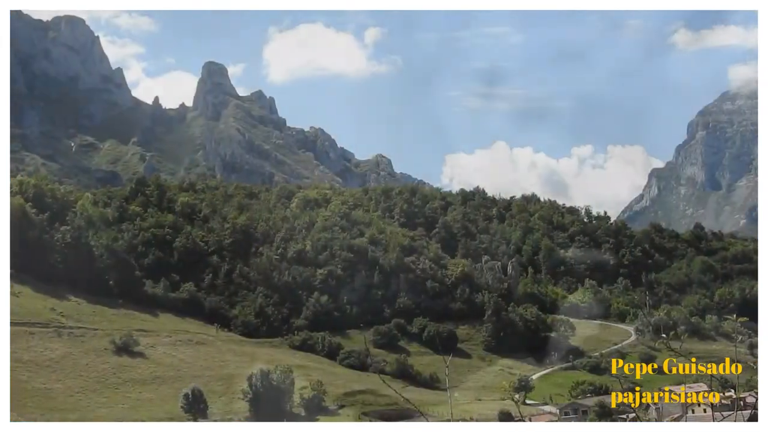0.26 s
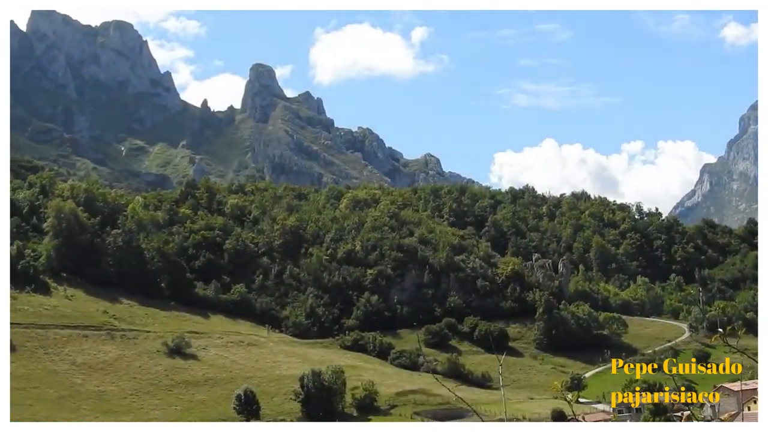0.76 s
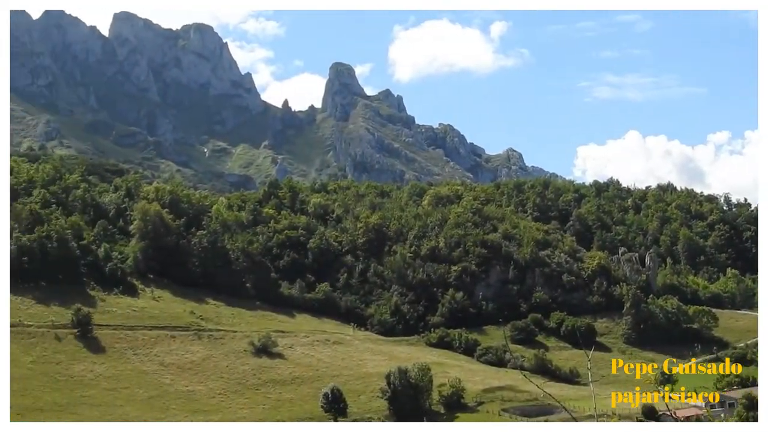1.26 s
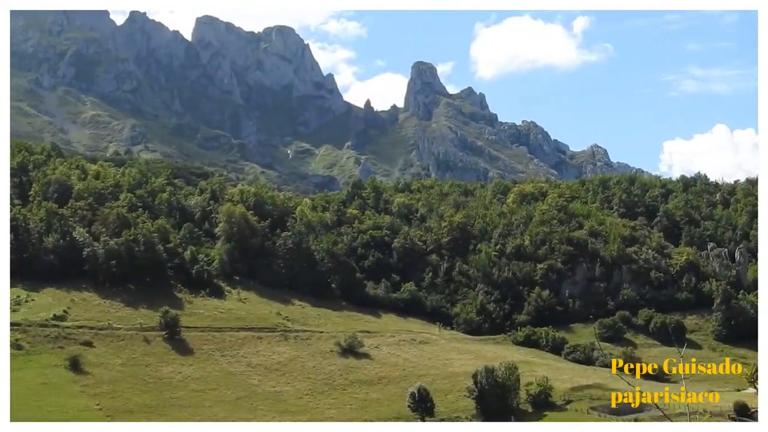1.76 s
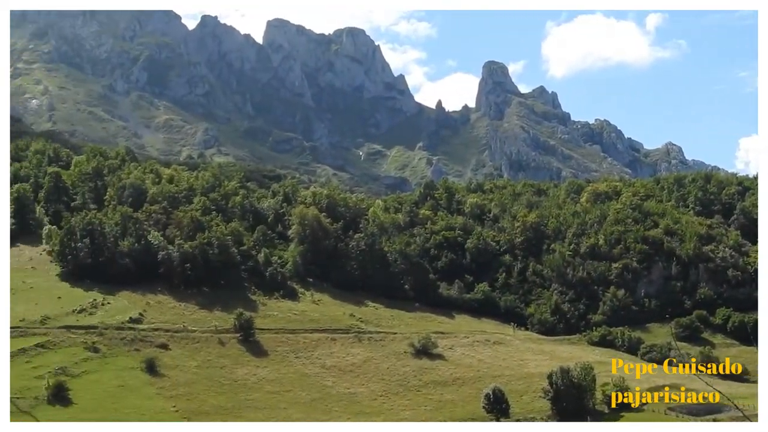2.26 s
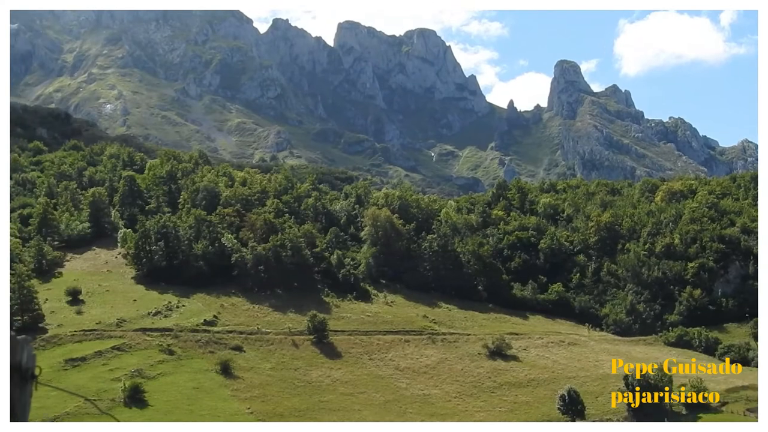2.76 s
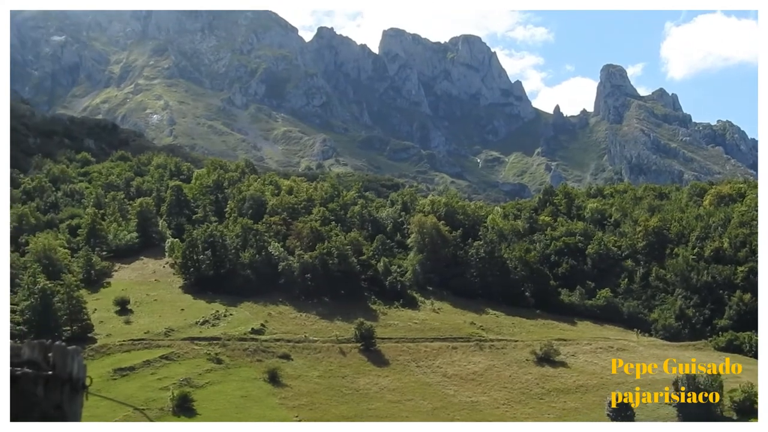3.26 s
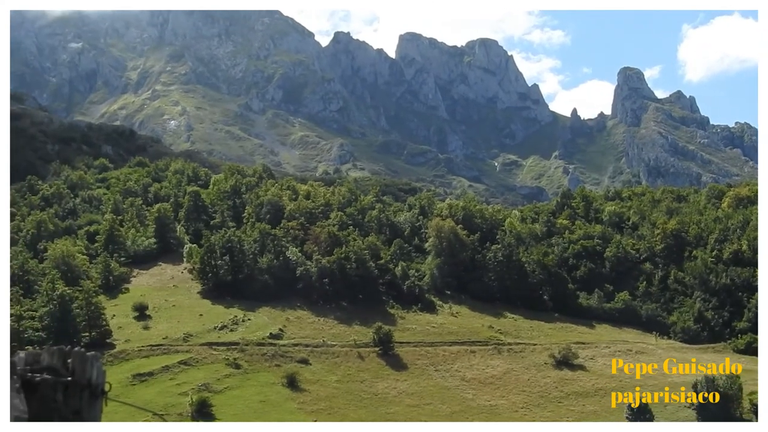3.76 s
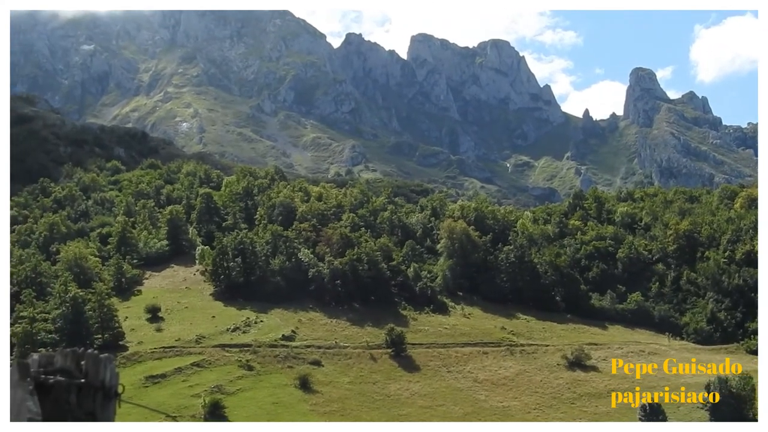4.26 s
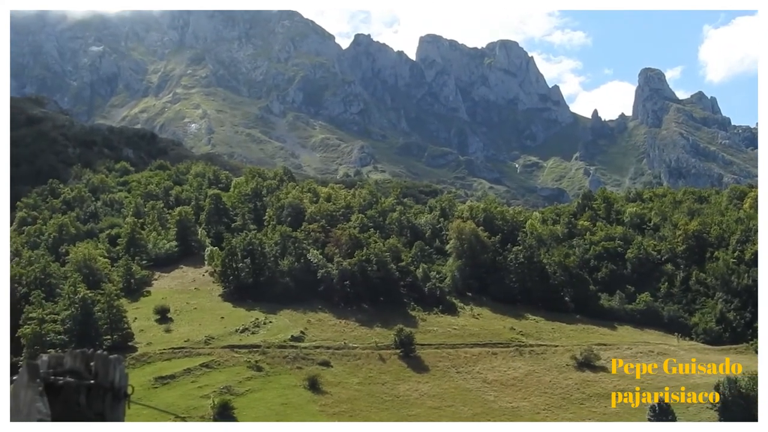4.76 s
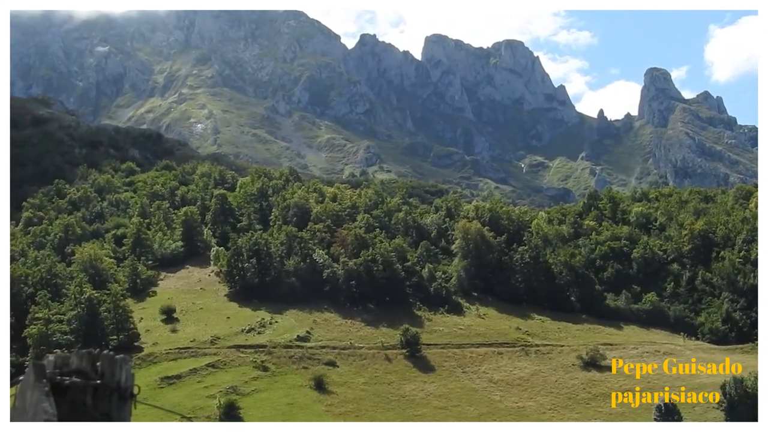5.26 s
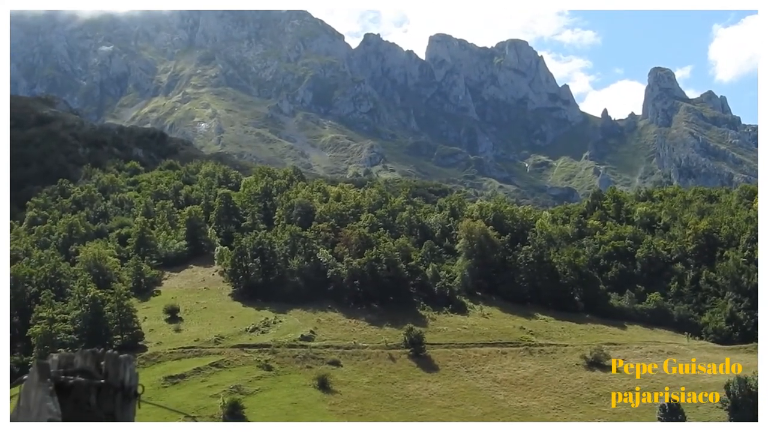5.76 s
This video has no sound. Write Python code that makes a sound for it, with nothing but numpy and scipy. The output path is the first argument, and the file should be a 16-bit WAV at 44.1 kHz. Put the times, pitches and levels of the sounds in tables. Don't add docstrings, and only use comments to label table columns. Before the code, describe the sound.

Gusty outdoor stereo: deep, lumpy wind rumble strikes left and right separately, strong early, quieter in the middle and strong again late. A near bird, mainly on the right, rasps and chirps about eight times a second, falls silent, then repeats short level whistles about six times a second with woodland echo. Tiny distant birds squeak, churr and blur into faint song behind a soft hiss of leaves.

```python
import sys
import numpy as np
from scipy import signal
from scipy.fft import rfft, irfft, next_fast_len
from scipy.io import wavfile
from scipy.ndimage import uniform_filter1d

SR = 44100
rng = np.random.default_rng(int(sys.argv[2]) if len(sys.argv) > 2 else 0)


def generate_wav(signal):
    frames = np.transpose(np.atleast_2d(signal))
    scaled = np.clip(frames, -1, 1) * 32767
    pcm = np.round(scaled).astype(np.int16)
    wavfile.write(sys.argv[1], SR, pcm)


def gain_from_db(level_db):
    decades = np.asarray(level_db, float) / 20
    return 10 ** decades


N = 265702

# (time [s], time to the top [s], start [Hz], top [Hz], level [dB])
CHIRPS = [(.528, 0.0031, 2605, 2744, -24.5), (0.791, 0.0048, 2580, 2670, -26),
          (1.143, 0.016, 2560, 2733, -21.5), (1.271, 0.016, 2460, 3000, -20.5),
          (1.39, 0.018, 2543, 3000, -20), (1.512, 0.019, 2473, 3000, -19.5),
          (1.645, 0.017, 2410, 3000, -19.5), (1.772, 0.014, 2255, 3313, -18.5),
          (1.9, 0.014, 2170, 3190, -19), (2.026, 0.018, 2604, 3357, -17.5),
          (2.165, 0.014, 2450, 3350, -17.5), (2.313, 0.017, 2517, 3350, -18)]
CHIRP_OVERTONES = [-3, -8, -16]
# (time [s], length [s], level [dB], beak band [dB])
RASPS = [(0.028, 0.07, -26, -1.5), (0.269, 0.061, -26, -1.5), (0.494, 0.053, -26.5, 2.5),
         (0.761, 0.043, -27, -2), (1.124, 0.033, -28.5, 3.5), (1.26, 0.021, -28, -1),
         (1.38, 0.016, -29, -3), (1.503, 0.02, -28, -2.5), (1.634, 0.019, -27, -2.5),
         (1.759, 0.019, -27, -10), (1.89, 0.018, -27.5, -9), (2.016, 0.019, -28, -6.5),
         (2.153, 0.019, -25.5, -12), (2.304, 0.022, -27.5, -11.5)]
# (frequency [Hz], gain [dB])
THROAT = [(900, -31), (1700, -6), (2500, 0.5), (3400, -3.5), (4400, 0), (5300, 2.5), (6000, -4),
          (6650, -4.5), (7100, 13.5), (7900, -7), (8400, -20), (9500, -82)]
# (frequency [Hz], gain [dB])
CHEST_BAND = [(400, -40), (750, -5), (2100, -5), (2900, -11), (3600, 0), (4100, -8), (4600, -30),
              (6000, -80)]
BEAK_BAND = [(3000, -90), (4400, -24), (5100, 3), (6000, 8.5), (7200, -2), (8000, -12.5), (8500, -52),
             (9500, -98)]
# (time [s], length [s], top [Hz], level [dB], slow climb [Hz])
WHISTLES = [(3.929, 0.15, 2237, -17, 18.3), (4.123, 0.11, 2299, -17, 120), (4.298, 0.092, 2310, -18.5, 71),
            (4.475, 0.083, 2270, -17, 22), (4.643, 0.084, 2293, -17, 60), (4.811, 0.1, 2262, -17.5, 120),
            (4.981, 0.098, 2259, -17.5, 129.6), (5.152, 0.093, 2215, -18.5, 96),
            (5.315, .089, 2249, -17, 110), (5.484, 0.092, 2190, -17.5, 92),
            (5.649, 0.087, 2252, -17.5, 189), (5.809, 0.084, 2194, -18, 190),
            (5.97, 0.12, 2200, -22.5, 180)]
# (time [s], level [dB])
OCTAVE = [(3.93, -24), (4.13, -29), (4.3, -23), (4.7, -19.5), (5.0, -18), (5.15, -26), (6.0, -28)]
CATCH_LEVELS = [-43, -4.5, -5, -4.5, -1, -3.5, -3, -7, -7, -6.5, -7.5, -10.5, -5]
# (frequency [Hz], gain [dB])
CATCH_BAND = [(1000, -40), (1350, 3.5), (1700, -30), (2550, -16), (3000, 0), (3300, -12), (4800, -30)]
# (frequency [Hz], gain [dB])
CALL_ECHO = [(2000, -0.5), (6000, 5.5)]
WOOD_RING = [(1750, -8), (1880, 0), (2100, -1), (2220, 2), (2400, 1), (4500, 1)]
SLOPE_ECHO = [(1900, -4.0), (2150, -1.5), (2240, 1.3), (4500, -6.5)]
# (frequency [Hz], gain [dB])
GROUND_DIP = [(1750, -2), (1900, 0), (2030, 0), (2125, -11), (2190, 0)]
# (frequency [Hz], gain [dB], phase [rad])
LEFT_PORT = [(1023, -12, -17), (2200, -14, 1), (3100, -9, 1), (4200, -3, -1.5), (6000, -4, -1.62),
             (7600, -2, -2.5)]
# (frequency [Hz], gain [dB])
SNAP_TICK = [(2500, -74), (3900, -40), (4700, -1), (6000, 4.0), (9000, -14), (10500, -20), (12000, -55)]

# (time [s], length [s], start [Hz], end [Hz], level [dB])
SLIDES = [(0.19, 0.15, 7960, 7350, -60), (0.354, 0.19, 7800, 6860, -59), (2.42, .025, 8050, 7700, -63),
          (2.451, 0.068, 7370, 6500, -49.5), (2.579, .01, 6000, 7560, -54), (2.583, .035, 7600, 6800, -48),
          (2.605, .045, 6950, 6350, -40.5), (2.645, .022, 6500, 5850, -44), (2.732, .008, 6300, 6900, -48),
          (2.735, .038, 6730, 6020, -42), (2.765, .05, 6100, 5100, -46.5), (2.726, .008, 3000, 3880, -57),
          (2.742, .007, 3520, 4500, -58), (2.747, .012, 2560, 5000, -56), (2.774, .008, 2880, 4100, -56),
          (2.872, 0.078, 6650, 4750, -49.5), (2.938, .022, 4980, 4930, -53),
          (2.757, 0.009, 3800, 5700, -46), (2.79, 0.009, 3600, 5900, -44), (2.812, .016, 3640, 5460, -53),
          (3.679, 0.055, 7200, 6400, -49.5), (3.81, 0.04, 7000, 6400, -52.5), (3.85, .026, 6350, 5800, -58),
          (4.045, .06, 6500, 6800, -57), (3.763, 0.056, 1310, 1313, -51.5), (0.575, .035, 7500, 6900, -48),
          (0.632, 0.065, 6850, 6440, -58.5), (5.285, 0.05, 3520, 3530, -45), (5.455, .035, 3550, 3500, -47),
          (5.515, .035, 3500, 3480, -58), (5.47, 0.14, 3110, 3150, -45.5), (5.632, 0.067, 3110, 3090, -49),
          (5.724, 0.08, 3130, 3100, -49), (5.835, 0.078, 3110, 3090, -65)]
# (time [s], length [s], level [dB], centre [Hz])
CHATTER = [
    (.005, 0.044, -55, 5800),
    (0.175, 0.029, -50.5, 5900),
    (0.252, .03, -52, 5700),
    (3.292, 0.027, -46.5, 6000),
    (3.494, 0.034, -45.5, 6000),
    (4.586, 0.019, -46, 5770),
    (4.78, 0.049, -46, 5470),
    (4.973, 0.044, -45.5, 5550),
]
# (time [s], length [s], low band [dB], high band [dB])
CHURR = [(3.612, 0.064, -50, -47), (3.666, 0.042, -51.5, -54), (3.71, 0.055, -53, -51),
         (3.762, 0.06, -52, -54), (3.814, 0.078, -49.5, -51.5), (3.875, 0.059, -50, -52),
         (3.923, 0.066, -53, -48), (3.995, 0.06, -47, -51), (4.075, 0.037, -55, -53)]
CHURR_LOW_HZ, CHURR_HIGH_HZ = 4000, 5700
# (frequency over centre [ratio], gain [dB])
PUFF_BAND = [(.5, -80), (.75, -20), (.85, -3), (1, 0), (1.16, -3), (1.3, -22), (1.6, -80)]
# (time [s], level [dB])
CHORUS = [
    (4.1, -82),
    (4.308, -63),
    (5.458, -53.5),
    (6.02, -50.5),
]
# (time [s], length [s], level [dB])
WHEEZE = [
    (5.26, .03, -65),
    (5.292, 0.15, -57),
    (5.5, 0.25, -53.5),
    (5.703, 0.23, -51.5),
    (5.9, 0.2, -52.5),
]
# (frequency [Hz], gain [dB])
BLUR_BAND = [(450, -41.0), (750, -7.5), (1100, -17.5), (1800, -41), (2500, -27.0), (2900, -0.5),
             (3400, -4.5), (4300, -0.5), (5000, -10.5), (5400, -12.5), (6500, -96.5)]
WHEEZE_BAND = [(4500, -80), (5300, -19.0), (5600, 4.0), (6300, -2.0), (6800, -37), (7500, -86.0)]

# (time [s], length [s], level [dB], change while it lasts [dB])
LEFT_GUSTS = [(.1, .06, -32, -7), (.165, 0.12, -16.5, -4), (.485, 0.084, -14.5, 5.5), (.6, .13, -12.5, 4.5),
              (.73, 0.048, -19.5, 6.5), (.8, 0.037, -10, -9), (.94, 0.15, -21, -5.5),
              (1.39, 0.05, -20.5, 2), (4.02, 0.095, -38, 11.5), (4.18, 0.16, -33.5, -2),
              (4.435, 0.051, -29.5, 8), (4.565, 0.034, -21, -3), (4.85, 0.097, -28.5, -1),
              (4.92, 0.15, -15.5, -0.5), (5.07, 0.19, -20.5, 8.5), (5.33, 0.14, -14.5, 3.5),
              (5.5, .06, -26, -17), (5.57, 0.14, -17, 1.5), (5.77, 0.078, -17, 3), (5.9, 0.019, -17, 5.5),
              (5.95, 0.094, -24, -1.5)]
RIGHT_GUSTS = [(0, 0.0098, -17, -22), (.1, 0.097, -32.5, 21.5), (.49, 0.16, -16, 6), (.68, 0.053, -13, -12),
               (.78, 0.419, -12.5, -1), (1.22, 0.17, -18.5, -10), (1.325, 0.28, -14, -7.5),
               (1.62, 0.21, -20.5, -3.5), (1.865, 0.025, -23, 9), (1.95, 0.1, -23, -4.5),
               (2.085, 0.13, -15.5, 3), (2.23, 0.21, -23, 4.5), (2.46, 0.1, -26.5, 6.5),
               (2.6, 0.17, -26, 2.5), (2.93, 0.044, -34, 7), (3.03, 0.036, -33, 7),
               (3.145, 0.028, -36, 10.5), (3.36, 0.19, -33.5, -2), (3.52, 0.044, -27.5, 14),
               (3.6, 0.062, -33.5, 11.5), (3.75, 0.027, -33, 8), (3.83, 0.15, -32.5, -7.5),
               (3.99, 0.088, -18, 6), (4.11, 0.43, -22, 1.5), (4.58, 0.167, -18.5, -4),
               (4.85, 0.37, -23, -3), (5.14, 0.36, -11, -11.5), (5.31, 0.12, -15, 1), (5.5, 0.4, -20.5, 4),
               (5.985, 0.022, -29.5, 20.5)]
# (frequency [Hz], density [dB per Hz])
BUFFET = [(12, -54.5), (25, -50.5), (70, 5), (112, 7.5), (175, 2.5), (230, -13.5), (300, -64.5), (400, -81)]
BREEZE = [(12, -22.5), (20, -10.5), (81, 10.5), (93, 10.5), (130, -2.5), (200, -10), (230, -19.5),
          (250, -31), (320, -41), (550, -120)]
ROAR = [(150, -9.5), (230, 7), (350, -10.5), (600, -22.5), (1200, -27.5), (3000, -54)]
# (time [s], peak [dB], balance [dB])
SNAPS = [(0.553, -27, 16), (0.613, -28, -20), (.624, -28, 9), (0.641, -29.5, 6), (0.69, -26.5, 8.5),
         (0.701, -34, 5.5), (0.715, -27.5, 13), (0.785, -40.5, -18), (0.804, -23.5, -20),
         (0.856, -33, -18.5), (0.976, -34, -23), (1.137, -30, -26), (2.14, -30.5, -23.5), (2.143, -31, -11),
         (5.164, -28.5, -17), (5.175, -31.5, -21), (5.2, -31, -18), (5.202, -37, -13), (5.364, -29.5, -0.5),
         (5.429, -24.5, -3), (5.919, -31.5, 18.5), (6.012, -39, -9)]
# (frequency [Hz], gain [dB])
OVERLOAD_BAND = [(150, -7.0), (400, 0.5), (1500, -20.5), (5000, -30.5), (15000, -53.5)]

# (frequency [Hz], gain [dB])
AIR_BEFORE = [(150, -9), (250, -2.5), (450, 2.5), (800, -4.5), (1250, -5.5), (1700, -9.5), (3900, -13.5),
              (6500, -11.5), (7400, -15.5), (8200, -21), (11000, -26), (16000, -36.5)]
AIR_AFTER = [(150, -26), (300, -6.5), (500, -6), (700, -5.5), (1050, -10.5), (1370, 0.5), (1650, -3.5),
             (2500, 0), (4500, -12.5), (6600, -8), (7300, -19.5), (11000, -28), (16000, -41)]
# (frequency [Hz], likeness [0-1])
LIKENESS = [(300, 0.16), (800, 0.85), (2500, 0.37), (6000, 0.032), (12000, .1)]

OVERTONE_LAG = int(.0102 * SR)


def evened(x):
    return x / np.sqrt(np.mean(x ** 2) + 1e-20)


def read(points, hz, axis=1):
    table = np.transpose(points)
    return np.interp(np.log(hz + 1), np.log(table[0] + 1), table[axis])


def add(mix, s, sound):
    part = mix[..., round(s * SR):][..., :sound.shape[-1]]
    part += sound[..., :part.shape[-1]]


def colour(x, points):
    size = next_fast_len(x.shape[-1] + 2048)
    gain = gain_from_db(read(points, np.fft.rfftfreq(size, 1 / SR)))
    return irfft(rfft(x, size) * gain, size)[..., :x.shape[-1]]


def sides(pan_db):
    return gain_from_db(np.array([[pan_db / 2], [-pan_db / 2]]))


def wander(size, span_s):
    width = max(int(span_s * SR), 2)
    noise = rng.standard_normal(size + 4 * width)
    return evened(uniform_filter1d(uniform_filter1d(noise, width), width))[:size]


def late_overtones(base, over):
    return np.pad(base, (0, OVERTONE_LAG)) + np.pad(over, (OVERTONE_LAG, 0))


def nuthatch():
    chirps, rasps, song = np.zeros((3, N))
    for s, *row in CHIRPS:
        add(chirps, s, chirp(*row))
    for s, *row in RASPS:
        add(rasps, s, rasp(*row))
    for (s, length, top_hz, db, climb_hz), catch_db in zip(WHISTLES, CATCH_LEVELS):
        octave_db = np.interp(s, *np.transpose(OCTAVE))
        add(song, s, whistle(length, top_hz, db, climb_hz, octave_db))
        add(song, s + .003, catch(db + catch_db))
    calls = colour(chirps, THROAT) + rasps
    echoes = gain_from_db(-12) * trunks(calls, .06, start=.003) + gain_from_db(-20) * trunks(calls, .26)
    right = calls + colour(echoes, CALL_ECHO)
    branches = gain_from_db(-12) * trunks(song, .05, start=.004)
    right += colour(song + branches, GROUND_DIP)
    ring = trunks(song, .9, start=.015)
    right += gain_from_db(-9.5) * colour(ring, WOOD_RING)
    add(right, .067, gain_from_db(-11) * colour(song, SLOPE_ECHO))
    hz = np.fft.rfftfreq(N, 1 / SR)
    shade = gain_from_db(read(LEFT_PORT, hz)) * np.exp(1j * read(LEFT_PORT, hz, axis=2))
    return np.array([irfft(rfft(right) * shade, N), right])


def chirp(top_s, start_hz, top_hz, db, end_hz=1820, fall_s=.027, break_hz=2950):
    t = np.arange(0, top_s + fall_s, 1 / SR)
    up, down = np.clip(t / top_s, 0, 1), np.clip((t - top_s) / fall_s, 0, 1)
    crack = np.clip((top_hz - 3100) / 150, 0, 1)
    edge_hz = top_hz - crack * (top_hz - break_hz)
    hz = start_hz + (edge_hz - start_hz) * up ** 1.5 + (top_hz - edge_hz) * (up >= 1)
    hz -= (top_hz - end_hz) * np.sin(np.minimum(1.12 * down, 1) * np.pi / 2) ** (1.5 + 1.7 * crack)
    hz = uniform_filter1d(hz, int(220 - 130 * crack)) - 400 * np.exp(-t / .002)
    hz *= 1 + .007 * wander(len(t), .003)
    turn = 2 * np.pi * np.cumsum(hz) / SR

    steep = (top_hz - 2600) / 700
    sag_db = -6.0 * np.sin(np.pi * down ** .5) * steep
    pip = gain_from_db(-16) * np.exp(-((2 * hz - 3800) / 220) ** 2) * np.sin(2 * turn)
    tone = gain_from_db(sag_db) * np.sin(turn) + pip

    gap_db = -12.0 * crack * np.exp(-((down - .58) / .13) ** 2)
    thinning = np.sin(np.pi * np.minimum(down ** (1 + .6 * crack) / 1.6, 1)) ** 2
    fade_db = -(13.0 - 3.0 * crack) * thinning - 13.0 * (1 - up) ** 2
    over = np.zeros(len(t))
    for partial, over_db in enumerate(CHIRP_OVERTONES, 2):
        flutter_db = 2.0 * wander(len(t), .003)
        over += gain_from_db(over_db + fade_db + flutter_db + gap_db) * np.sin(partial * turn)
    shape = gain_from_db(db + 2.0 * wander(len(t), .003) - 5.0 * down ** 2 - 3.0 * (1 - up) ** 2)
    shape *= signal.windows.tukey(len(t), .25)
    return late_overtones(shape * tone, shape * over)


def rasp(length, db, beak_db, noisy=.42):
    t = np.arange(0, length, 1 / SR)
    u = t / length
    hz = (600 + 1650 * np.exp(-((u - .7) / .2) ** 2)) * (1 + 0.08 * wander(len(t), 0.0018))
    turn = 2 * np.pi * np.cumsum(hz) / SR
    voice = evened(sum(np.sin(k * turn) for k in range(1, 9)))
    puffs = gain_from_db(6.0 * wander(len(t), .0012)) * rng.standard_normal(len(t))
    drive = (1 - noisy) * voice + noisy * evened(puffs)
    chest = evened(colour(drive, CHEST_BAND)) * np.sin(np.pi * u ** 1.51) ** 2
    beak = evened(colour(drive, BEAK_BAND)) * np.sin(np.pi * u ** 1.13) ** 2
    return gain_from_db(db) * late_overtones(chest, gain_from_db(beak_db) * beak)


def whistle(length, top_hz, db, climb_hz, octave_db, low_hz=1830, rise_s=.01199, fall_s=.028):
    t = np.arange(0, length + fall_s, 1 / SR)
    down = np.clip((t - length) / fall_s, 0, 1)
    hz = top_hz - (top_hz - climb_hz - low_hz) * np.exp(-t / rise_s)
    hz -= climb_hz * np.maximum(1 - t / length, 0)
    hz -= 430 * np.sin(down * np.pi / 2) ** 1.3
    hz *= 1 + .012 * (np.exp(-t / .02) + down) * wander(len(t), .002)
    turn = 2 * np.pi * np.cumsum(hz) / SR
    held_db = -12.0 * np.exp(-t / .012) - 12.0 * down + 2.2 * wander(len(t), .008)
    over = gain_from_db(held_db + octave_db) * (np.sin(2 * turn) + gain_from_db(-25.5) * np.sin(3 * turn))
    swell_db = -5.0 * np.exp(-t / 0.0084) - 6.9 * np.minimum(4.2 * down, 1) + 0.93 * wander(len(t), 0.02)
    shape = gain_from_db(db + swell_db) * signal.windows.tukey(len(t), .22)
    return late_overtones(shape * np.sin(turn), shape * over)


def catch(db):
    hiss = colour(rng.standard_normal(int(.024 * SR)), CATCH_BAND)
    return gain_from_db(db - 16.5) * evened(hiss) * np.hanning(len(hiss))


def trunks(x, t60, start=0.0077):
    taps = np.zeros(SR)
    at = np.arange(int(start * SR), SR - 22, 22)
    taps[at + rng.integers(0, 22, len(at))] = rng.choice([-1., 1.], len(at))
    taps *= gain_from_db(-60 * np.arange(SR) / SR / t60)
    return signal.oaconvolve(x, taps / np.linalg.norm(taps))[:N]


def beak_snap():
    out = np.zeros((2, N))
    pulses = signal.unit_impulse(300, 100) - 1.9 * signal.unit_impulse(300, 170)
    tick = colour(pulses, SNAP_TICK)
    add(out, 3.9285, np.tile(gain_from_db(-21) * tick / tick.max(), (2, 1)))
    return out


def far_birds():
    calls = far_slides() + far_chatter()
    echoes = np.array([trunks(side, .35) for side in calls])
    return calls + gain_from_db(-8) * echoes + far_song()


def far_slides():
    out = np.zeros((2, N))
    for s, length, start_hz, end_hz, db in SLIDES:
        pan_db = -10.5 if end_hz < 4000 else 1
        hz = np.linspace(start_hz, end_hz, int(length * SR))
        hz *= 1 + .003 * wander(len(hz), .002)
        tone = np.sin(2 * np.pi * np.cumsum(hz) / SR) * gain_from_db(db + 3.0 * wander(len(hz), .004))
        add(out, s, sides(pan_db) * tone * signal.windows.tukey(len(hz), .5))
    return out


def far_chatter():
    out = np.zeros((2, N))
    puffs = list(CHATTER)
    for s, length, low_db, high_db in CHURR:
        puffs += [(s, length, low_db, CHURR_LOW_HZ), (s, length, high_db, CHURR_HIGH_HZ)]
    for s, length, db, centre_hz in puffs:
        band = [(ratio * centre_hz, gain_db) for ratio, gain_db in PUFF_BAND]
        hiss = colour(rng.standard_normal(int(length * SR)), band)
        add(out, s, sides(-1.7) * gain_from_db(db) * evened(hiss) * np.hanning(len(hiss)))
    return out


def far_song():
    breaths = np.zeros(N)
    for s, length, db in WHEEZE:
        add(breaths, s, gain_from_db(db) * np.hanning(int(length * SR)))
    thin = evened(colour(rng.standard_normal(N), WHEEZE_BAND)) * breaths
    s, db = np.transpose(CHORUS)
    level = gain_from_db(np.interp(np.arange(N) / SR, s, db, left=-90) + 3.35 * wander(N, 0.035))
    blur = evened(colour(rng.standard_normal(N), BLUR_BAND)) * level
    return sides(2.0) * thin + sides(-15.0) * blur


def wind():
    level_db = np.array([gusting(LEFT_GUSTS, -45), gusting(RIGHT_GUSTS, -41)])
    strong = np.clip((level_db + 26.0) / 14.75, 0, 1)
    noise = rng.standard_normal((2, N))
    push = strong * evened(colour(noise, BUFFET)) + (1 - strong) * evened(colour(noise, BREEZE))
    push *= gain_from_db(4.0 * np.array([wander(N, .025), wander(N, .025)]))
    push *= gain_from_db(level_db) / np.sqrt(uniform_filter1d(push ** 2, int(.1 * SR)) + 1e-9)
    roar = evened(colour(noise[::-1], ROAR)) * gain_from_db(5.0 * wander(N, .012))
    push += roar * gain_from_db(-43.5 + 2.84 * (level_db + 16.5))
    return .95 * np.tanh(push / .95) + overload_snaps()


def gusting(gusts, lull_db):
    t, out = np.arange(N) / SR, np.full(N, float(lull_db))
    for s, length, db, change_db in gusts:
        held_db = db + change_db * np.clip((t - s) / length, 0, 1)
        edge_db = 504.5 * np.maximum(s - t, 0) + 506 * np.maximum(t - s - length, 0)
        out = np.maximum(out, held_db - edge_db)
    return out


def overload_snaps():
    out = np.zeros((2, N))
    snap = colour(signal.unit_impulse(600, 300), OVERLOAD_BAND)
    for s, db, pan_db in SNAPS:
        add(out, s - 300 / SR, sides(pan_db) * gain_from_db(db + 6.5) * snap / snap.max())
    return out


def air():
    frames, hz = N // 256 + 5, np.fft.rfftfreq(1024, 1 / SR)
    a, b, c, d, patches = rng.standard_normal((frames, 513, 5)).T
    patches = evened(uniform_filter1d(uniform_filter1d(patches, 12, 0), 14, 1))
    same = np.clip(read(LIKENESS, hz), -1, 1)[:, None]
    left = a + 1j * b
    right = same * left + np.sqrt(1 - same ** 2) * (c + 1j * d)
    leaves = np.array([left, right]) * gain_from_db(1.4 * patches)

    def hiss(shape):
        tinted = leaves * gain_from_db(read(shape, hz))[:, None]
        return evened(signal.istft(tinted, nperseg=1024, noverlap=768)[1][:, :N])

    before = gain_from_db(-47.5) * sides(0.51) * hiss(AIR_BEFORE)
    after = gain_from_db(-49) * sides(-3.4) * hiss(AIR_AFTER)
    later = np.clip((np.arange(N) / SR - 4.1) / 0.0085, 0, 1)
    return (1 - later) * before + later * after


def scene():
    return nuthatch() + beak_snap() + far_birds() + wind() + air()


def top_cut(x):
    return signal.sosfilt(signal.butter(12, 15790, fs=SR, output="sos"), x)


def record(dry):
    return top_cut(dry)


dry = scene()
out = record(dry)
generate_wav(out)
```